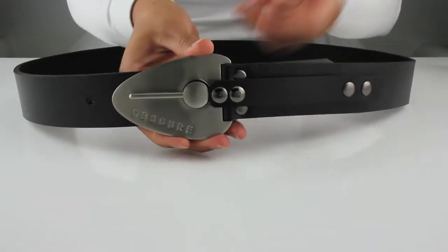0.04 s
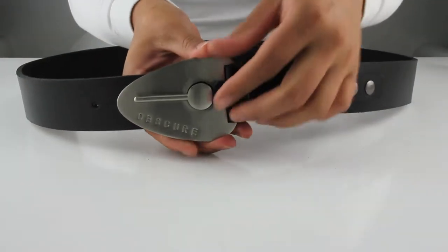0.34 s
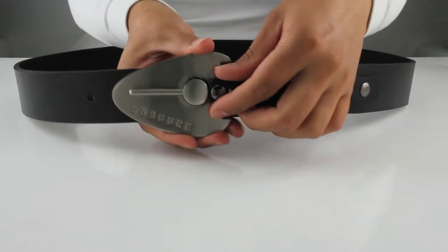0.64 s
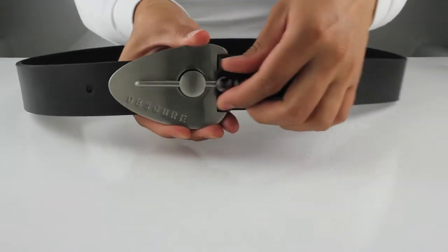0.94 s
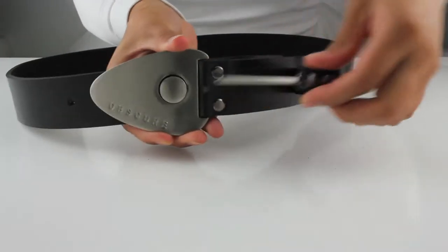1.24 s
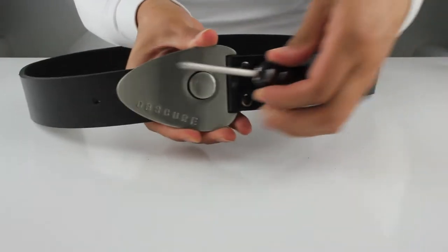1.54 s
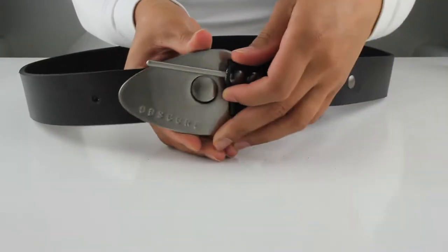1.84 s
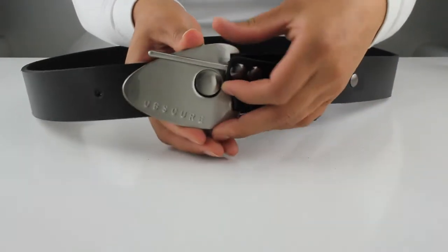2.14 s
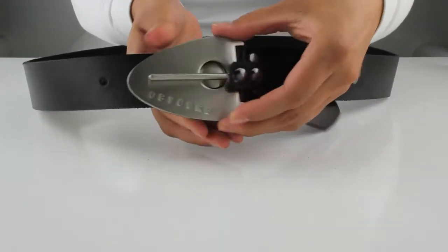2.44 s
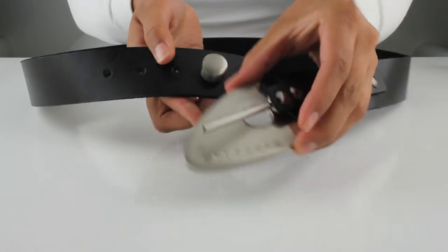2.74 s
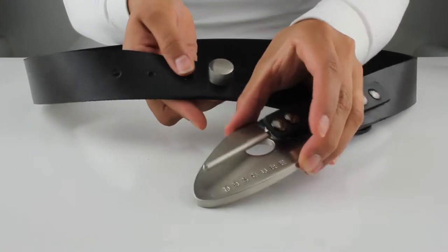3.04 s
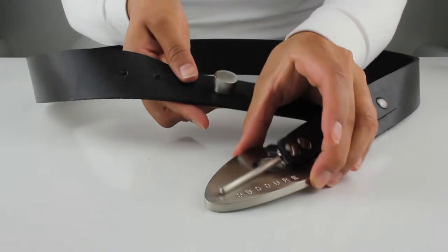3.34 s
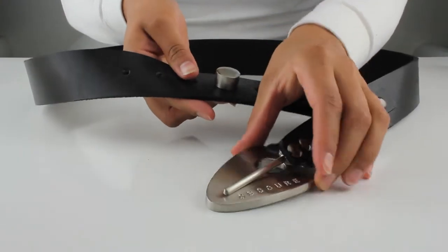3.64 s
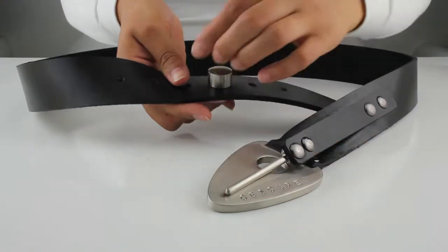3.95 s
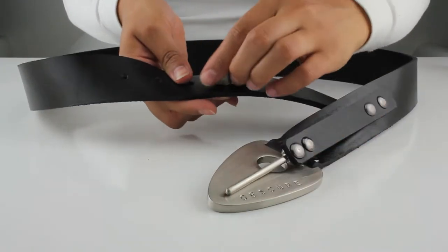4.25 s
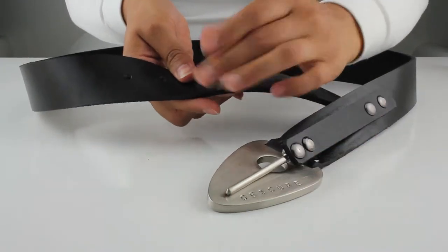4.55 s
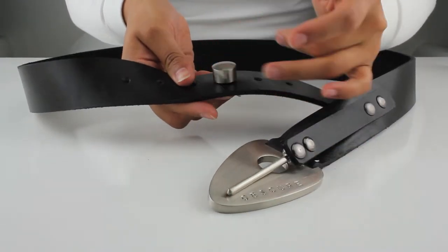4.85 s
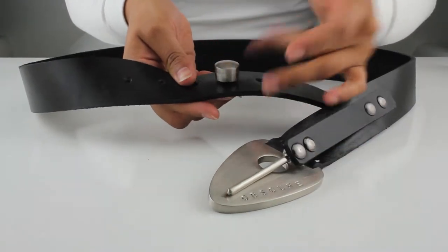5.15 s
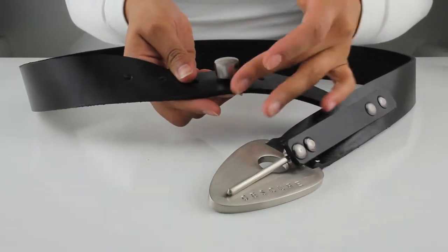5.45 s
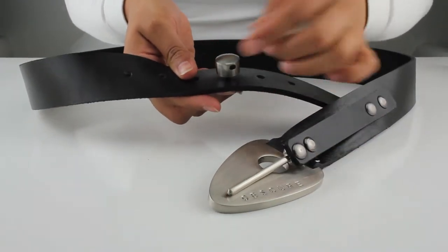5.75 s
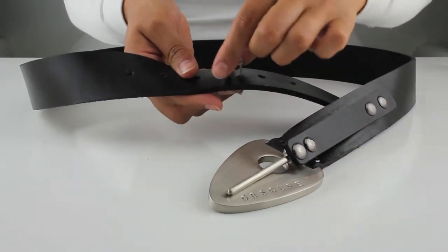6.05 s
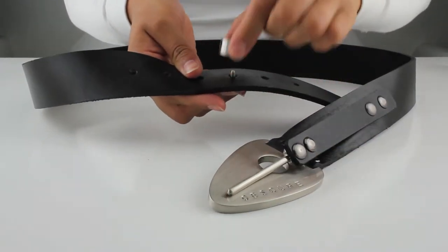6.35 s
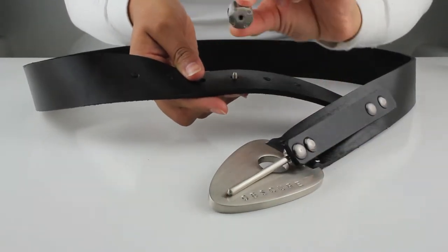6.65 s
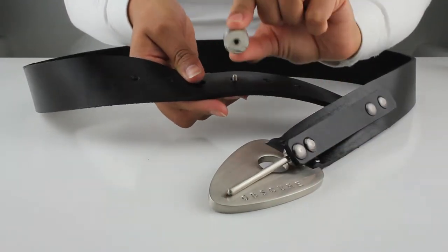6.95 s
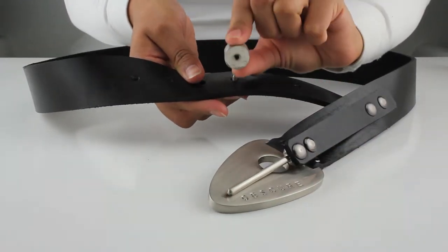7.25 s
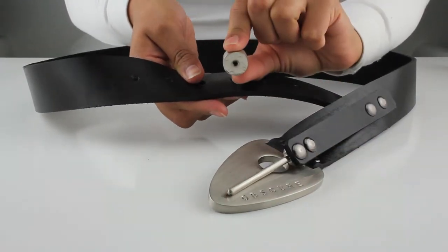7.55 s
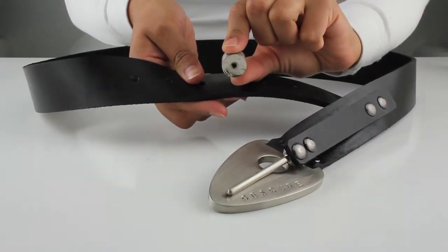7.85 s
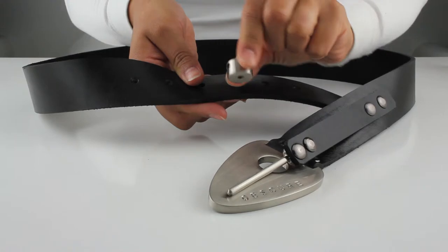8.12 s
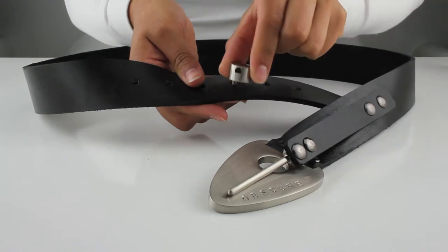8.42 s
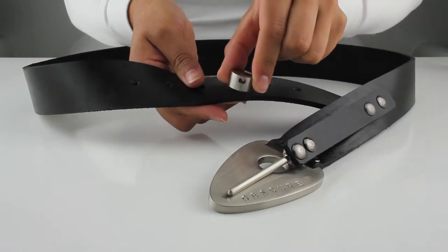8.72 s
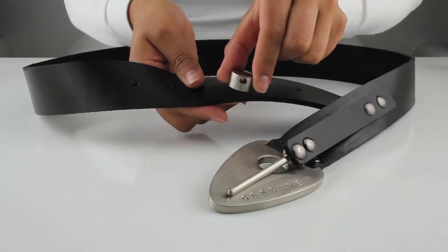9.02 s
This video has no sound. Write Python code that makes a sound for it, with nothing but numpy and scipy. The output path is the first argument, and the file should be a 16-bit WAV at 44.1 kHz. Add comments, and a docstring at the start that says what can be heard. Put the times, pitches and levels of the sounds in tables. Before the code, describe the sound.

A metal belt buckle is unfastened with small scrapes and clinks, knocked down loudly on a table, then softly fingered.

```python
"""A metal belt buckle is taken apart by hand over a table in a small, quiet room.
The pin catches and scrapes out of its stud and clinks on the plate; the plate snaps free and the
leather strap flops. The plate is knocked down, rings the table top and settles; fingers then rub
the strap and work the stud loose. Hits are a crack plus damped modes, rubs are stick-slip noise.
Hiss and a ventilation drone lie underneath."""
import sys
import numpy as np
from scipy import signal
from scipy.fft import rfft, irfft, next_fast_len
from scipy.io import wavfile

SR = 44100
rng = np.random.default_rng(int(sys.argv[2]) if len(sys.argv) > 2 else 0)


def put_to_file(sound):
    """Save the sound as 16-bit audio at rate SR, in the file named by the first command-line argument."""
    columns = np.atleast_2d(sound).T  # one column per channel
    safe = np.clip(columns, -1, 1)
    whole_steps = np.round(safe * 32767)
    wavfile.write(sys.argv[1], SR, whole_steps.astype(np.int16))


N = 400428
RING_TIME_S = np.arange(SR // 2) / SR

# room hiss (frequency [Hz], density [dB])
HISS_SPECTRUM = [(25, -33.5), (45, -10.5), (65, -5.5), (118, -7), (175, -6), (250, -9), (400, -13),
                 (700, -16), (1400, -18.5), (2800, -21.5), (6000, -23.5), (13500, -28), (16000, -32.5)]
# ventilation drone (centre [Hz], half-width [Hz], level [dB])
DRONE_BANDS = [(119.4, 16, -65.5), (248.4, 15.3, -67), (325.7, 12, -75.5), (680, 13, -78)]
# reverberation (frequency [Hz], t60 [s])
ROOM_DECAY = [(150, 0.45), (600, 0.28), (2500, 0.28), (6000, 0.21), (14000, 0.11)]

# skin on metal and leather (midpoint [s], length [s], level [dB], centre [Hz])
RUBS = [(0.217, 0.19, -58.5, 5640), (.34, .086, -56.5, 6000), (0.5, .17, -53.5, 7000),
        (1.766, .11, -57, 2800), (2.67, 0.098, -56, 4500), (2.931, 0.067, -53, 6000),
        (4.316, .12, -60.5, 10000), (4.404, .14, -53.5, 10900), (4.637, 0.32, -55.5, 15000),
        (4.767, 0.087, -47, 11000), (5.105, 0.078, -49, 11000), (5.157, 0.027, -47, 11000),
        (5.485, 0.039, -44.5, 10900), (6.199, .05, -52.5, 4930), (8.07, .11, -62, 12500)]
# finger rubs and pin rasp (frequency [Hz], gain [dB])
RUB_SPECTRUM = [(200, -4), (900, 18.5), (2000, 8.5), (4500, 0.5), (7000, 0), (10000, 1), (13000, -1),
                (16000, -3.5)]
# leather and buckle shifting on the table (midpoint [s], length [s], level [dB])
DRAGS = [(3.14, 0.16, -54), (3.341, 0.2, -53), (3.499, 0.2, -54.5), (4.63, .14, -47.5), (4.746, 0.16, -51),
         (5.132, 0.13, -59)]
# drag friction (frequency [Hz], gain [dB])
DRAG_SPECTRUM = [(90, -4), (300, 5.5), (500, 1.5), (900, 2), (1600, 1.5), (2200, -7.5), (3500, -8.5),
                 (6000, -14), (16000, -18)]
# metal, nail and leather ticks (time [s], level [dB], centre [Hz], half-width [oct])
TICKS = [(.3916, -43.5, 2600, 2.9), (1.4679, -52, 1800, .7), (1.536, -52.5, 3120, .5),
         (1.577, -49, 3070, 1.2), (1.6406, -47.5, 2900, 1.6), (1.6852, -47.5, 2600, 1.6),
         (1.8999, -41, 4500, 1.34), (1.98, -45, 1940, 1), (2.0081, -43.5, 2000, 2),
         (3.1248, -42.5, 3000, 5.5), (3.162, -42, 6500, 2.7), (3.23, -44, 4960, 1.9),
         (3.287, -45.5, 1900, 2.1), (3.329, -44.5, 3200, 3), (3.344, -44, 1900, 2),
         (3.421, -45.5, 2500, 1.5), (3.4493, -39.5, 1900, 1.05), (3.4786, -38, 4000, 9.8),
         (3.831, -44, 3140, 1.8), (4.5814, -45.5, 1920, 3), (4.6105, -46, 3000, 3.3),
         (4.6437, -47, 2000, 2.2), (4.6966, -38, 11000, 12), (5.0248, -43, 8000, 0.39),
         (5.138, -49, 9500, .9), (5.1518, -41.5, 11000, 0.93), (5.479, -47, 9850, 0.29),
         (6.1885, -50, 5500, 0.82), (8.794, -55, 4000, 0.32), (8.9412, -52.5, 4800, 1)]
# light contact (frequency [Hz], gain [dB])
TICK_SPECTRUM = [(150, -1), (700, 12.5), (1400, 10), (1900, 11.5), (2600, 4), (3500, 2.5), (4600, 3),
                 (7000, 1.5), (10000, 2), (13000, 2.5), (16000, -2)]
# spells of fingering (start [s], end [s], level [dB], centre [Hz])
FIDGETS = [(3.121, 3.37, -53, 5000), (4.619, 4.76, -51, 2600), (5.4, 5.56, -56, 8000)]

# strap landings (time [s], level [dB])
STRAP_FLOPS = [(2.4622, -33), (2.4675, -44), (4.236, -50)]
# leather resonances (frequency [Hz], level [dB], t60 [s])
STRAP_MODES = [(181.5, -3.5, 0.088), (248, -3.5, 0.044), (340, -3.5, 0.076), (435, -2, .04),
               (620, -7, 0.036)]
# puff of a flop (frequency [Hz], gain [dB])
STRAP_SPECTRUM = [(50, -20), (200, 4), (450, -9.5), (750, -26), (1500, -32), (5000, -48)]

# blows on the table (time [s], level [dB], bare-metal contact re blow [dB])
KNOCKS = [(0.231, -45, -25), (2.9657, -7.5, -18), (3.1796, -27.5, 1), (3.7257, -29, -37),
          (4.8318, -32, -26), (4.9112, -35.5, -25), (5.158, -45, -20), (5.205, -47, -16),
          (5.486, -48.5, -23)]
# distinct board resonances (frequency [Hz], level [dB], t60 [s])
TABLE_MODES = [(106, -12, 0.1), (184, -14, 0.13), (217, -6.5, 0.074), (297, -14.5, 0.25), (389, -9, 0.2),
               (500, -21, 0.16), (632, 1.5, 0.045), (697, -2.5, 0.12), (822, -1.5, 0.13), (941, -3.5, .12),
               (1054, -11, 0.047), (1138, -7, 0.093), (1215, -4, 0.13), (1500, -12, 0.08),
               (1990, -1.5, 0.019), (2210, -7, 0.029), (2590, -3, .04)]
# board thud (frequency [Hz], gain [dB])
TABLE_SPECTRUM = [(35, -33), (75, -5.5), (115, -8.5), (200, -4), (400, -5.5), (750, -2), (1400, -1),
                  (2000, -0.5), (2900, -9), (5000, -15), (10000, -14), (16000, -19)]
# dense board modes (frequency [Hz], t60 [s])
TABLE_DECAY = [(100, 0.074), (400, 0.17), (1000, 0.11), (2200, 0.05), (5000, 0.039), (12000, 0.011)]
# loose buckle ringing as it lands (frequency [Hz], level [dB], t60 [s])
CHATTER_MODES = [(2340, -6, .025), (3270, -5, .03), (3970, -3, .03), (4410, 0, .04), (5390, -6, .03),
                 (6570, -4, .035), (8100, -4, .035), (9350, -8, .04), (9780, -8, .11), (11600, -9, .035),
                 (13400, -12, .03)]
# crack of the landing buckle (frequency [Hz], gain [dB])
CHATTER_SPECTRUM = [(300, -26), (1500, -10.5), (4000, -5.5), (9000, -10), (16000, -11)]

# pin catching in the stud (time [s], level [dB])
PIN_CATCHES = [(.6846, -49), (.7067, -51), (.7493, -50), (.8137, -48.5), (.8389, -45), (0.8666, -44.5),
               (.9269, -39), (.951, -48), (1.003, -50), (1.0461, -36), (1.1732, -40)]
# pin shaft, then tip (peak time [s], level [dB], rise [dB/s], fall [dB/s], rasp re scrape [dB])
PIN_SCRAPES = [(1.06, -49, 45, 55, -17), (1.072, -46.5, 250, 350, -1), (1.177, -42, 600, 650, 3)]
# pin friction (frequency [Hz], gain [dB])
SCRAPE_SPECTRUM = [(150, -6), (400, -1.5), (850, 2.5), (1300, 0), (1900, 2.5), (2700, -7), (3600, -6),
                   (4500, -9), (5600, -4), (9000, -9), (12000, -8), (16000, -17)]
# sliding pin resonances (frequency [Hz], level [dB], t60 [s])
SCRAPE_MODES = [(1940, 1, .010), (3600, 3, 0.0074), (5450, 0, .012), (6330, -7, .009), (9500, -6, .01),
                (11700, -5, .013), (15400, -6, .011)]
# pin hitting the plate (time [s], level [dB])
PIN_CLINKS = [(2.0853, -21.5), (2.0876, -29.5), (2.0899, -41.5)]
# ring of pin on plate (frequency [Hz], level [dB], t60 [s])
PIN_MODES = [(3170, -5, .06), (3334, -22, .15), (3560, 2, .024), (3760, 2, 0.025), (3920, -1, .026),
             (6370, -12, .04), (9620, 3, .06), (10228, -9, .05), (11700, 0.5, .042), (11850, -9, 0.031),
             (13550, -14, .04), (15400, -24, .06)]
# crack of pin on plate (frequency [Hz], gain [dB])
PIN_SPECTRUM = [(200, -55.5), (800, -10.5), (2300, -5.5), (3600, 3), (5000, 0.5), (8500, 0), (12000, -10.5),
                (16000, -22)]
# plate leaving the stud (time [s], level [dB])
PLATE_SNAPS = [(2.3660, -14.5), (2.3675, -22.5)]
# finger-damped plate resonances (frequency [Hz], level [dB], t60 [s])
PLATE_MODES = [(1800, -21, .035), (5050, 0, .009), (5300, -8, .013), (8020, -2, .007), (8700, 0, .008),
               (10650, 4, .006), (11900, -5, .007), (12700, -3, .008), (14750, -3, .007), (15500, -1, .008)]
# crack of the snap (frequency [Hz], gain [dB])
PLATE_SPECTRUM = [(100, -34), (300, -9), (1000, -13.5), (3500, -4), (5200, -4.5), (7000, -4), (10000, 1.5),
                  (13400, -10), (16000, -3)]


def amp(db):
    return 10 ** (np.asarray(db) / 20)


def unit_rms(x):
    return x / np.sqrt(np.mean(x ** 2) + 1e-20)


def unit_energy(x):
    return x / np.sqrt(np.sum(x ** 2) + 1e-20)


def interp_log_hz(points, hz):
    points_hz, values = np.transpose(points)
    return np.interp(np.log(hz + 1), np.log(points_hz), values)


def add(mix, start_s, sound):
    part = mix[max(round(start_s * SR), 0):][:len(sound)]
    part += sound[:len(part)]


def hit_at_level(sound, db):
    """Scales a hit to the energy of 5 ms at this level."""
    return amp(db) * unit_energy(sound) * np.sqrt(.005 * SR)


def colour(x, spectrum, centre_hz=1000, half_width_oct=np.inf):
    """Minimum-phase filter: a spectrum times an optional hump."""
    hz = abs(np.fft.fftfreq(4096, 1 / SR))
    hump = 1 / (1 + (np.log2((hz + 1) / centre_hz) / half_width_oct) ** 2)
    log_gain = np.log(amp(interp_log_hz(spectrum, hz)) * hump)
    taps = np.fft.ifft(np.exp(np.conj(signal.hilbert(log_gain)))).real
    return signal.oaconvolve(x, taps[:len(taps) // 2])[:len(x)]


def decay(t60_s):
    return np.exp(-np.log(1000) * RING_TIME_S / max(t60_s, 1e-3))


def ring(modes):
    """Damped modes; the contact point sets each sign."""
    partials = (rng.choice([-1, 1]) * amp(db) * decay(t60_s) * np.cos(2 * np.pi * hz * RING_TIME_S)
                for hz, db, t60_s in modes)
    return unit_energy(sum(partials))


def diffuse(band_decays):
    """Dense modes or echoes: noise with a decay per band."""
    size = len(RING_TIME_S)
    noise_bins, hz = rfft(rng.choice([-1., 1.], size)), np.fft.rfftfreq(size, 1 / SR)
    centres_hz, t60s_s = np.transpose(band_decays)
    out = np.zeros(size)
    for one_band, t60_s in zip(np.eye(len(band_decays)), t60s_s):
        band_gain = interp_log_hz(np.c_[centres_hz, one_band], hz)
        out += irfft(noise_bins * band_gain, size) * decay(t60_s)
    return unit_energy(out)


def crack(t60_s, push_db=-4):
    """A sharp push, then surface roughness crushed in the contact."""
    roughness = unit_energy(rng.choice([-1., 1.], len(RING_TIME_S)) * decay(t60_s))
    return amp(push_db) * (RING_TIME_S == 0) + roughness


def contacts(hits, modes, spectrum, crack_db, crack_t60_s):
    """Hits on one object, each a ring plus a crack."""
    out = np.zeros(N)
    for time_s, db in hits:
        ringing = ring(modes)
        impact = amp(crack_db) * unit_energy(colour(crack(crack_t60_s), spectrum))
        add(out, time_s, hit_at_level(ringing + impact, db))
    return out


def tick(db, centre_hz, half_width_oct, t60_s):
    """A light touch on a part the hand keeps from ringing."""
    touch = crack(t60_s, push_db=-8)
    return hit_at_level(colour(touch, TICK_SPECTRUM, centre_hz, half_width_oct), db)


def friction(size, slips_per_s, spread_db, relax_s=.001):
    """Hiss that rises with each tiny slip."""
    slipping = rng.random(size) < slips_per_s / SR
    strength = amp(spread_db * np.minimum(rng.exponential(1, size), 2))
    surge = signal.lfilter([1], [1, -np.exp(-1 / (relax_s * SR))], slipping * strength)
    return unit_rms(rng.standard_normal(size) * (1 + surge))


def add_stroke(mix, mid_s, db, sound):
    """A stroke swells and fades around its midpoint."""
    add(mix, mid_s - len(sound) / SR / 2, amp(db) * unit_rms(sound) * np.hanning(len(sound)))


def room_air(hiss_db=-56.66):
    """Steady hiss and a low ventilation drone."""
    size = next_fast_len(N, True)
    hz = np.fft.rfftfreq(size, 1 / SR)
    hiss = amp(hiss_db) * unit_rms(amp(interp_log_hz(HISS_SPECTRUM, hz)))
    power = hiss ** 2
    for centre_hz, half_width_hz, db in DRONE_BANDS:
        peak = 1 / (1 + ((hz - centre_hz) / half_width_hz) ** 2)
        power += (amp(db) * unit_rms(peak)) ** 2
    return irfft(rfft(rng.standard_normal(size)) * np.sqrt(power), size)[:N]


def room_reverb(x, build_s=.0027, echo_s=.0245, echo_db=-11):
    """Early echoes build into a short tail; one wall echo stands out."""
    build_up = 1 - np.exp(-(RING_TIME_S / build_s) ** 2)
    tail = unit_energy(diffuse(ROOM_DECAY) * build_up)
    add(tail, echo_s, amp([echo_db]))
    return signal.oaconvolve(x, tail)[:N]


def rubs_and_drags(one_octave_at_hz=7100):
    """Bright finger friction, narrower when higher; duller drags on the table."""
    out = np.zeros(N)
    for mid_s, length_s, db, centre_hz in RUBS:
        hiss = friction(int(length_s * SR), slips_per_s=500, spread_db=1.5)
        add_stroke(out, mid_s, db, colour(hiss, RUB_SPECTRUM, centre_hz, one_octave_at_hz / centre_hz))
    for mid_s, length_s, db in DRAGS:
        grit = friction(int(length_s * SR), slips_per_s=200, spread_db=4)
        add_stroke(out, mid_s, db, colour(grit, DRAG_SPECTRUM))
    return out


def finger_ticks(t60_s=.037, ticks_per_s=17, spread_db=.5):
    """Single clear ticks, and fainter uneven ones from fingering."""
    out = np.zeros(N)
    for time_s, db, centre_hz, half_width_oct in TICKS:
        add(out, time_s, tick(db, centre_hz, half_width_oct, t60_s))
    for start_s, end_s, db, centre_hz in FIDGETS:
        for slot_s in np.arange(start_s, end_s, 1 / ticks_per_s):
            time_s = slot_s + rng.random() / ticks_per_s
            tick_db = db - spread_db * rng.standard_normal()
            add(out, time_s, tick(tick_db, centre_hz, half_width_oct=1.3, t60_s=t60_s))
    return out


def strap_flop():
    """Leather lands with a dull puff and low, damped modes."""
    return contacts(STRAP_FLOPS, STRAP_MODES, STRAP_SPECTRUM, crack_db=6.5, crack_t60_s=.061)


def pin_catches(ref_db=-47.5, ref_hz=6500, ref_t60_s=.021, db_per_oct=16):
    """The pin catches in the stud; stronger catches are deeper and longer."""
    out = np.zeros(N)
    for time_s, db in PIN_CATCHES:
        weight = 2 ** ((db - ref_db) / db_per_oct)
        add(out, time_s, tick(db, ref_hz / weight, half_width_oct=1.43, t60_s=ref_t60_s * weight))
    return out


def pin_scrape(ring_db=-3, free_s=1.215, release_s=.04):
    """The pin drags through the stud until free; its slips excite the metal."""
    out = np.zeros(N)
    from_peak_s = np.arange(-.3, .3, 1 / SR)
    size = len(from_peak_s)
    for peak_s, db, rise_db_per_s, fall_db_per_s, rasp_db in PIN_SCRAPES:
        slips = friction(size, slips_per_s=550, spread_db=2.5)
        metal = unit_rms(signal.fftconvolve(slips, ring(SCRAPE_MODES))[:size])
        scrape = unit_rms(unit_rms(colour(slips, SCRAPE_SPECTRUM)) + amp(ring_db) * metal)
        rasp = colour(rng.standard_normal(size), RUB_SPECTRUM, centre_hz=4800, half_width_oct=1.04)
        scrape += amp(rasp_db) * unit_rms(rasp)
        envelope = amp(db + np.minimum(rise_db_per_s * from_peak_s, -fall_db_per_s * from_peak_s))
        in_stud = np.clip((free_s - peak_s - from_peak_s) / release_s, 0, 1)
        add(out, peak_s + from_peak_s[0], in_stud * envelope * scrape)
    return out


def pin_clink():
    """The freed pin bounces on the plate and rings."""
    return contacts(PIN_CLINKS, PIN_MODES, PIN_SPECTRUM, crack_db=-4, crack_t60_s=.032)


def plate_snap():
    """The plate springs off the stud, damped by the fingers."""
    return contacts(PLATE_SNAPS, PLATE_MODES, PLATE_SPECTRUM, crack_db=0, crack_t60_s=.007)


def buckle_knocks(push_db=1, modes_db=-4, ring_db=-3, ref_db=-31, ref_corner_hz=3200, db_per_oct=9):
    """The buckle hits the table: the board rings, brighter when hit harder, and the metal chatters."""
    out = np.zeros(N)
    for time_s, db, metal_db in KNOCKS:
        thud = colour(amp(push_db) * (RING_TIME_S == 0) + diffuse(TABLE_DECAY), TABLE_SPECTRUM)
        board = unit_energy(thud) + amp(modes_db) * ring(TABLE_MODES)
        corner_hz = ref_corner_hz * 2 ** ((db - ref_db) / db_per_oct)
        board = signal.lfilter([1], [1, -np.exp(-2 * np.pi * corner_hz / SR)], board)
        add(out, time_s, hit_at_level(board, db))
        chatter = colour(crack(t60_s=.061), CHATTER_SPECTRUM)
        add(out, time_s, hit_at_level(chatter, db + metal_db))
        # fingers damp the ring by twice as many dB as the crack
        add(out, time_s, hit_at_level(ring(CHATTER_MODES), db + 2 * metal_db + ring_db))
    return out


def scene():
    """All sources close to one microphone, with a little room."""
    clink, snap, flop, knocks = pin_clink(), plate_snap(), strap_flop(), buckle_knocks()
    handling = finger_ticks() + pin_catches() + pin_scrape() + rubs_and_drags()
    direct = clink + snap + flop + knocks + handling
    send = amp(-14.5) * (clink + knocks) + amp(-12.5) * snap + amp(-7.5) * flop + amp(-9) * handling
    return (direct + room_reverb(send) + room_air())[None]


def record(dry, low_cut_hz=60, high_cut_hz=16200):
    """Microphone bass cut, input clipping on the hardest knock, band limit."""
    picked_up = signal.sosfilt(signal.butter(2, low_cut_hz, "high", fs=SR, output="sos"), dry)
    clipped = np.clip(picked_up, -1, 1)
    lowpass = signal.firwin(255, high_cut_hz, window=("kaiser", 8), fs=SR)
    return signal.oaconvolve(clipped, lowpass[None], "same")


dry = scene()
out = record(dry)
put_to_file(out)
```